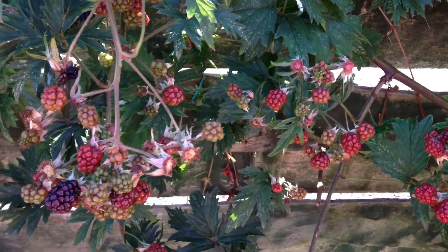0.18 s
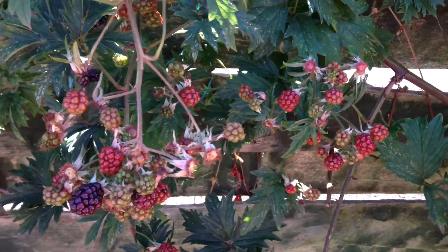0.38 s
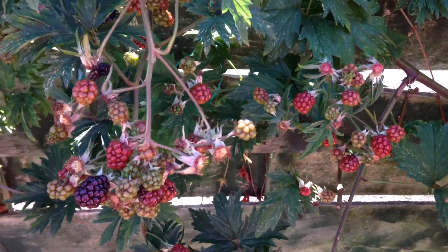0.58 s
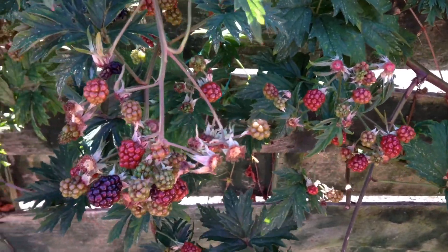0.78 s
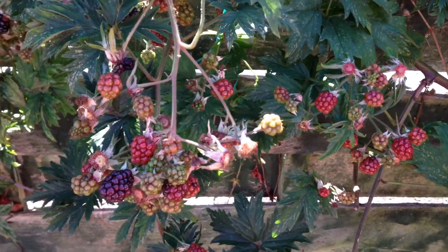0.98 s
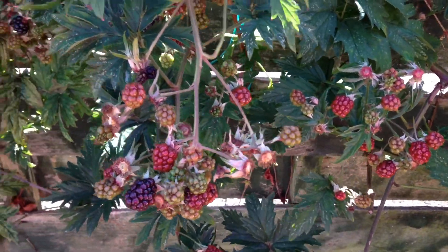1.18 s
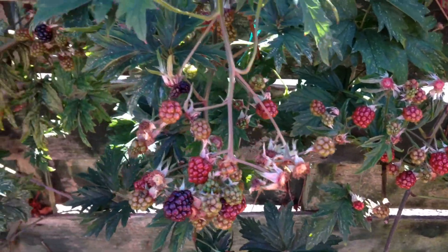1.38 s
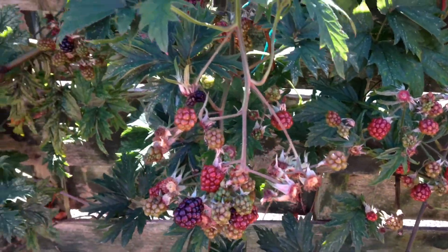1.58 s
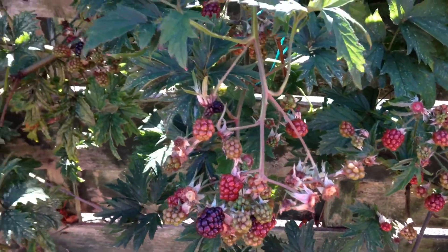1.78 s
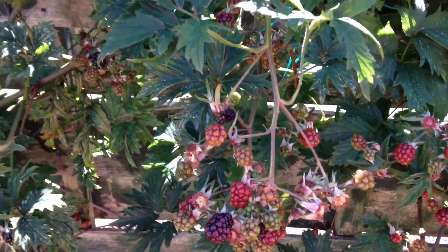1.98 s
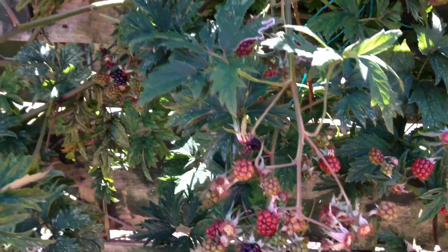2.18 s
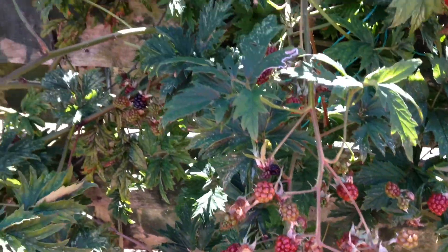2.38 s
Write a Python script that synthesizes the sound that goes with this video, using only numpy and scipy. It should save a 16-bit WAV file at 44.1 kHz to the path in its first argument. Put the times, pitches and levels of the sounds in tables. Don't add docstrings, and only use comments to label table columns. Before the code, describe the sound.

Gusty wind buffets a small microphone in low, fluttering thumps and rushes, with faint leaf rustle

```python
import sys
import numpy as np
from scipy import signal
from scipy.io import wavfile
from scipy.ndimage import uniform_filter1d

SR = 44100
rng = np.random.default_rng(int(sys.argv[2]) if len(sys.argv) > 2 else 0)


def undo_db(level):
    steps = np.asarray(level, float) / 20
    return 10 ** steps


def log_audio(samples):
    frames = np.atleast_2d(samples).T
    limited = np.clip(frames, -1, 1)
    pcm = np.round(limited * 32767).astype(np.int16)
    wavfile.write(sys.argv[1], SR, pcm)


N = 112455
T = np.arange(N) / SR


def evened(x):
    return x / np.sqrt(np.mean(x ** 2) + 1e-20)


def read(points, hz):
    f, value = np.transpose(points)
    return np.interp(np.log(hz + 1), np.log(f + 1), value)


def noise(db_field):
    size = 2 * (len(db_field) - 1)
    real, imaginary = rng.standard_normal(db_field.T.shape + (2,)).T
    spectra = (real + 1j * imaginary) * undo_db(db_field)
    return signal.istft(spectra, nperseg=size, noverlap=size * 3 // 4)[1][:N]


def drift(seconds):
    lowpass = signal.butter(2, 0.25 / seconds, fs=SR, output="sos")
    return evened(signal.sosfilt(lowpass, rng.standard_normal(N)))


def wavelet(hz, cycles, phase):
    half = round(5 * cycles * SR / hz)
    u = np.arange(-half, half + 1) * hz / SR
    return np.exp(-.5 * (u / cycles) ** 2) * np.cos(2 * np.pi * u + phase)


def train(hz, per_cycle):
    push_chance, spread_db = .62, 2.0
    draw, size, sign = rng.random((N, 3)).T
    arrives = draw < per_cycle * hz / SR
    strength = undo_db(spread_db * np.minimum(-np.log(size + 1e-9), 2.8))
    return evened(arrives * strength * np.where(sign < push_chance, 1, -1))


def place(rows):
    out = np.zeros(N + SR)
    for s, db, hz, cycles, phase in rows:
        w = wavelet(hz, cycles, phase)
        part = out[round((1 + s - len(w) / 2 / SR) * SR):][:len(w)]
        part += undo_db(db) * w[:len(part)]
    return out[SR:]


# (frequency [Hz], density [dB per Hz])
HISS_SPECTRUM = [(150, 4), (600, 6), (1500, 3), (2920, -2), (4890, -1.5), (9230, -9.5), (14600, -13),
                 (15500, -21)]


def hiss():
    level_db, patchy_db = -55.5, 1.4
    hz, frames = np.fft.rfftfreq(256, 1 / SR), N // 64 + 5
    patches = uniform_filter1d(rng.standard_normal((frames, len(hz))), 30, 0)
    patches = evened(uniform_filter1d(patches, 12, 1).T)
    return undo_db(level_db) * evened(noise(read(HISS_SPECTRUM, hz)[:, None] + patchy_db * patches))


# (onset [s], level [dB], hold [s], decay time T60 [s], low edge [Hz])
LEAF_STROKES = [(0.02, -71, 0.0038, 0.055, 1500), (0.096, -49, 0.017, 0.058, 1190),
                (0.288, -75.5, .005, 0.065, 3000), (0.39, -92, .02, 0.071, 2000),
                (0.5012, -25.5, 0.015, 0.27, 1360), (0.583, -44, 0.0037, .2, 1490),
                (1.677, -60.5, 0.015, 0.055, 5800), (1.82, -64, .02, .1, 3000),
                (2.26, -53, 0.003, 0.04, 4230), (2.27, -56, 0.015, 0.1, 4230),
                (2.489, -51.5, 0.0086, 0.059, 3000), (2.5485, -48, .002, 0.04, 5100)]
# (frequency [Hz], density [dB per Hz])
LEAF_SPECTRUM = [(1730, -5), (2870, -14), (4650, -12.5), (14300, -43.5), (15500, -58.5)]


def leaves():
    attack_s, treble_dies, grain_db = 0.0025, .55, .7
    hz = np.fft.rfftfreq(128, 1 / SR)[:, None]
    t = np.arange(N // 32 + 5) * 32 / SR
    power = 1e-14
    for s, db, hold, t60, low_hz in LEAF_STROKES:
        colour = undo_db(read(LEAF_SPECTRUM, hz)) ** 2 / (1 + (low_hz / (hz + 1)) ** 8)
        fall = np.maximum(t - s - hold, 0) / t60 * (hz / 2000 + .01) ** treble_dies
        attack = np.clip((t - s) / attack_s, 0, 1)
        power = power + colour / colour.mean() * undo_db(db - 60 * fall) ** 2 * attack
    grain = uniform_filter1d(rng.standard_normal((len(t), len(hz))), size=20, axis=1).T
    steady = noise(0 * power).std()
    return noise(10 * np.log10(power) + grain_db * evened(grain)) / steady


# (time [s], pressure [dB], air speed above the usual for that pressure [dB])
RUSHES = [
    [(0.0, -57, 2.5), (0.048, -34.5, -1), (0.122, -76, 9), (0.14, -29.5, -0.5), (0.19, -25.5, -0.5),
     (0.238, -20, 1), (0.26, -42, -3.5), (0.316, -19, -0.2), (0.4, -65.5, -3)],
    [(0.4, -56.5, 4), (0.44, -24.5, 1.5), (0.548, -25.5, 2.2), (0.56, -17, -4.5), (0.584, -20.5, -0.2),
     (0.62, -14.5, 1), (0.648, -22.5, 0.5), (0.655, -18, 4)],
    [(0.655, -27.5, -3.5), (0.667, -9.5, -3.1), (0.697, -5, 0.5), (0.759, -21, 2.6), (0.791, -20, 1.5),
     (0.811, -32, 1), (0.82, -20, -1)],
    [(0.82, -29, -2.5), (0.862, -13.5, -0.3), (0.99, -22, 0.2), (1.024, -8.5, 1.7), (1.082, -12, -2.3),
     (1.11, -14, 1.8), (1.144, -24, 0.2), (1.17, -40, 4.5)],
    [(1.17, -38, -0.7), (1.206, -11.5, 0.7), (1.284, -22, 0.2), (1.296, -13, 3), (1.32, -12, -1.4),
     (1.38, -64, 16.5)],
]
# (time [s], pressure [dB], air speed above the usual [dB])
LATE_RUSHES = [
    [(1.38, -32, -3), (1.404, -32, -0.5), (1.442, -29.5, -0.7), (1.462, -57, 11), (1.492, -43.5, -3.5),
     (1.542, -28.5, 0), (1.59, -36, 2.2)],
    [(1.59, -44, 3), (1.622, -18.5, 1), (1.658, -24, -3), (1.672, -22.5, -0.1), (1.796, -32, -2.5),
     (1.814, -18.5, -6), (1.85, -41, 4)],
    [(1.85, -21, -10), (1.86, -39.5, -2), (1.886, -17.5, -2), (1.944, -31, -0.8), (1.975, -31, 0),
     (2.0, -21, -1.5), (2.02, -22, 0.5), (2.065, -22, -4)],
    [(2.065, -35, 1), (2.077, -14.5, -1.5), (2.157, -12.5, -4.2), (2.179, -28, -1.5), (2.23, -24, -1.5),
     (2.267, -15, 0.6), (2.305, -39.5, 4), (2.32, -41, -1)],
    [(2.32, -48, 8), (2.332, -26.5, -1), (2.348, -26.5, -2), (2.414, -41.5, 5), (2.442, -20.5, -2),
     (2.53, -31.5, -1), (2.55, -14.5, -6)],
]


def rushes():
    calm_db = -49
    s, level_db, faster_db = np.vstack(RUSHES + LATE_RUSHES).T
    return np.maximum(np.interp(T, s, level_db), calm_db), np.interp(T, s, faster_db)


USUAL_DB = -20.5
# (time [s], pressure [dB])
RUMBLE = [(0.0, -51), (0.02, -48), (0.34, -36), (0.38, -64), (0.5, -30.5), (0.63, -34), (0.66, -21.5),
          (0.85, -41), (1.11, -27), (1.15, -40), (1.19, -20), (1.52, -51.5), (1.82, -25.5), (1.85, -37.5),
          (2.22, -28), (2.43, -46), (2.49, -45), (2.55, -62.5)]


def rumble(mean_db):
    level_db, follows = 5.5, 0.096
    swell_db = follows * (uniform_filter1d(mean_db, size=1500) - USUAL_DB)
    slow = undo_db(level_db + np.interp(T, *np.transpose(RUMBLE)) + swell_db)
    out = np.zeros(N)
    for hz in 70.3 * np.array([.65, 1, 1.5]):
        w = wavelet(hz, 0.22, 0.51)
        out += signal.oaconvolve(train(hz, 1.3) * slow, w / np.linalg.norm(w) / np.sqrt(3), "same")
    return out


def crowding():
    depth_db, width_s = -3.5, 0.0049
    near = sum(np.exp(-.5 * ((T - row[0]) / width_s) ** 2) for row in THUMPS + LATE_THUMPS + PULLS)
    return depth_db * np.minimum(near, 1)


# (frequency [Hz], strength [dB])
EDDY_SPECTRUM = [(60, -12), (130, 5.5), (280, 3.5), (520, -3.5), (900, -17.5), (1600, -39), (3200, -66)]


def buffet(mean_db, faster_db):
    flicker_db, flicker_s, speed_per_db = 1.6, .003, 0.3736
    sparser_above_hz = 700
    level_db = mean_db + flicker_db * np.minimum(drift(flicker_s), 1.5)
    speed = undo_db(faster_db + speed_per_db * (level_db - USUAL_DB))
    sizes = np.geomspace(70, 4000, num=14)
    share = np.array([undo_db(read(EDDY_SPECTRUM, hz / speed)) * np.sqrt(hz) for hz in sizes])
    share = share / np.linalg.norm(share, axis=0) * undo_db(level_db + crowding())
    out = np.zeros(N)
    for hz, gain in zip(sizes, share):
        w = wavelet(hz, 0.55, 0.25)
        arrivals = train(hz, 1.35 / (1 + hz / sparser_above_hz))
        out += signal.oaconvolve(arrivals * gain, w / np.linalg.norm(w), "same")
    return out


# (time [s], peak [dB])
SNAPS = [(0.228, -32.5), (0.6639, -12), (.69, -22), (0.7046, -2), (0.714, -30), (0.719, -26.5),
         (0.727, -26), (.785, -32), (0.8897, -31), (1.017, -16), (1.028, -21.5), (1.034, -18.5),
         (1.038, -27.5), (1.021, -24), (1.058, -26), (1.0737, -15), (1.085, -28), (1.105, -22),
         (1.1156, -21.5), (1.2129, -20), (1.2395, -10), (1.255, -32), (1.265, -32), (1.298, -18.5),
         (1.301, -23), (1.318, -27), (1.626, -33.5), (2.075, -30), (2.1076, -23.5), (2.147, -36),
         (2.239, -32), (2.261, -31)]


def snaps():
    return place([(s, db + 0.3, 1500, 0.29, np.pi / 2) for s, db in SNAPS])


# (time [s], peak [dB], pitch [Hz], width [cycles])
THUMPS = [(.052, -24, 250, .6), (0.2266, -3.5, 422, 0.22), (0.2292, -3.5, 400, 0.21), (0.232, 0.5, 390, .3),
          (0.2967, -13.5, 370, 0.46), (0.3126, -17, 377, 0.38), (0.3247, -16.5, 280, 0.29),
          (0.5618, -5.5, 449, 0.33), (0.6085, -8, 460, 1.8), (0.6244, 1.5, 440, 0.32),
          (0.6368, -9.5, 277, 0.23), (0.6609, 0, 500, 0.25), (0.669, 3, 246, 0.45),
          (0.6744, 3.5, 450, 0.27), (.6808, 2, 299, 0.69), (0.6935, 5, 300, 0.6), (.6972, 1, 328, .35),
          (0.7044, 1, 600, 0.36), (0.7316, 1.5, 492, 0.4), (0.7862, -2.5, 407, 0.57), (.434, -16, 500, .4),
          (.455, -15, 500, .5), (.8899, -9.5, 590, 0.4), (1.0188, -11.5, 350, 0.26),
          (1.025, -3.5, 366, 0.35), (1.0335, -1, 336, 0.3), (1.0382, -7, 600, 0.24), (1.0535, -9, 520, 1.3),
          (1.0792, -6.5, 400, 0.6), (1.0906, -7, 303, 0.25), (1.1085, 1, 420, 0.3), (1.1951, -3, 597, 0.24),
          (1.2122, 3.5, 517, 0.78), (1.2409, -3.5, 453, 1), (1.3006, 3, 416, 0.24), (1.3039, -6, 440, 0.22),
          (1.3134, -3.5, 447, 0.16), (1.3176, 4.5, 420, 0.29), (1.3237, -4.5, 388, 0.31)]
# (time [s], peak [dB], pitch [Hz], width [cycles])
LATE_THUMPS = [(1.552, -21, 400, .7), (1.629, -10, 323, 0.33), (1.6779, -12, 400, .4),
               (1.918, -14, 450, .5), (2.131, -9, 300, .6), (1.718, -11, 360, 0.44),
               (1.8082, -13, 199, 0.29), (1.8875, -6.5, 378, 0.22), (1.9829, -9.5, 370, 0.38),
               (2, -20, 490, 0.31), (2.0173, -14.5, 536, 0.78), (2.0758, -2, 420, 0.23),
               (2.0877, -9.5, 350, 0.32), (2.0942, -4, 298, 0.45), (2.1058, -7, 570, 0.13),
               (2.1182, -1, 412, 0.24), (2.1497, -1, 200, 0.51), (2.211, -12.5, 275, 0.29),
               (2.2558, -6, 523, 0.25), (2.261, -3, 480, 0.3), (2.444, -8.5, 350, 0.3)]
# (time [s], peak [dB], pitch [Hz], width [cycles])
PULLS = [(0.1924, -17.5, 252, 0.19), (.666, 0, 500, .25), (1.2068, -4, 450, 0.33), (1.2683, -3.5, 334, 0.2),
         (1.2948, -8.5, 278, 0.42), (1.6238, -7.5, 298, 0.316), (2.1475, -0.5, 400, 0.18),
         (2.2399, -8, 400, 0.12), (2.238, -8, 110, .25), (.903, -16, 70, .3), (.975, -14, 70, .3),
         (1.188, -9, 130, .3)]


def thumps():
    level_db, skew = -0.5, -0.27
    rows = [(s, db + level_db, hz, cycles, skew) for s, db, hz, cycles in THUMPS + LATE_THUMPS]
    rows += [(s, db + level_db, hz, cycles, skew + np.pi) for s, db, hz, cycles in PULLS]
    return place(rows)


def wind():
    mean_db, faster_db = rushes()
    pressure = rumble(mean_db) + buffet(mean_db, faster_db) + snaps() + thumps()
    port = signal.butter(3, 55, "high", fs=SR, output="sos")
    return undo_db(1.75) * signal.sosfilt(port, pressure)


def scene():
    return (hiss() + leaves() + wind())[None]


def top_cut(x):
    return signal.sosfilt(signal.butter(12, 15720, fs=SR, output="sos"), x)


def record(dry):
    knee_db, squeeze, recover_db_per_s, ceiling = -19, .3, 8, .97
    power_db = 10 * np.log10(abs(uniform_filter1d(dry[0] ** 2, 1500)) + 1e-12)
    fall = np.arange(N) * recover_db_per_s / SR
    held_db = np.maximum.accumulate(power_db + fall) - fall
    over_db = np.maximum(held_db - knee_db, 0)
    x = dry / undo_db(squeeze * uniform_filter1d(over_db, 400))
    return top_cut(x / (1 + (x / ceiling) ** 4) ** (1 / 4))


dry = scene()
out = record(dry)
log_audio(out)
```